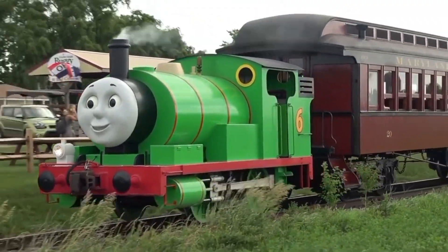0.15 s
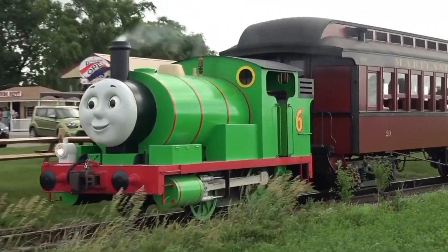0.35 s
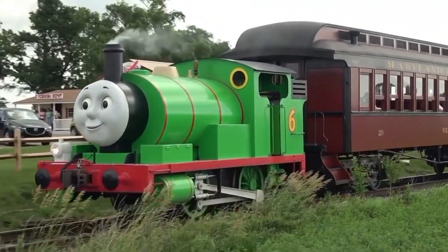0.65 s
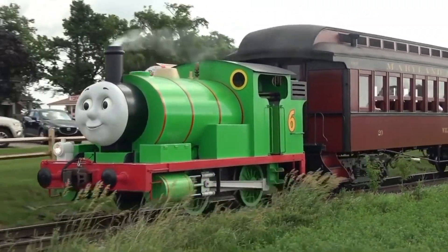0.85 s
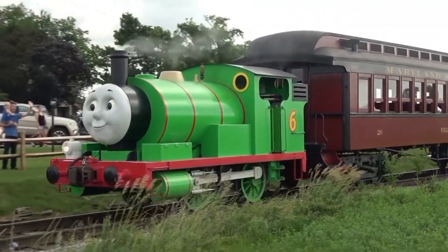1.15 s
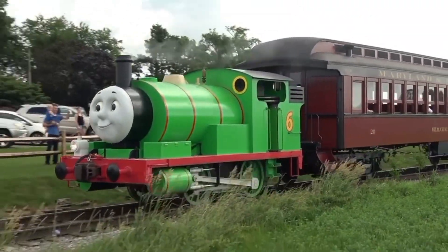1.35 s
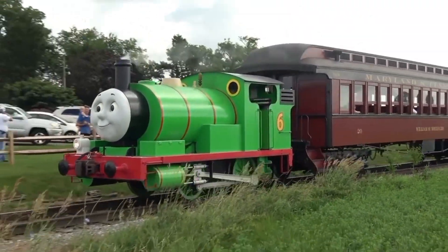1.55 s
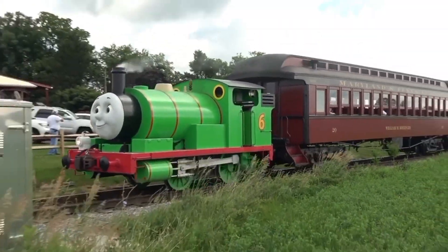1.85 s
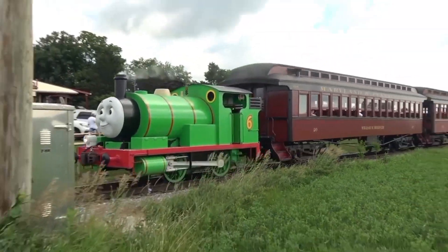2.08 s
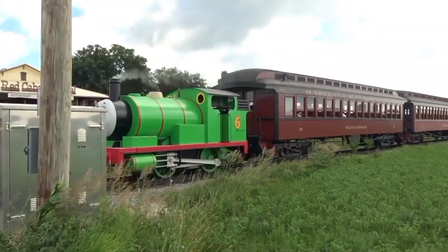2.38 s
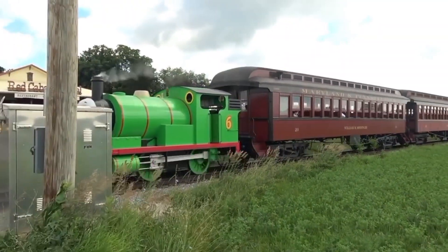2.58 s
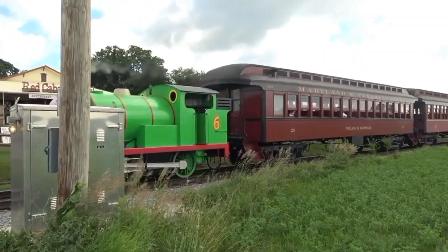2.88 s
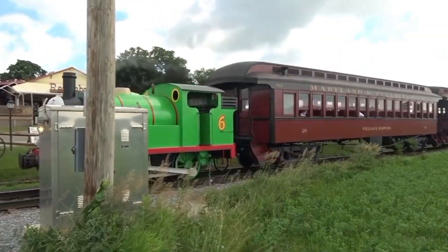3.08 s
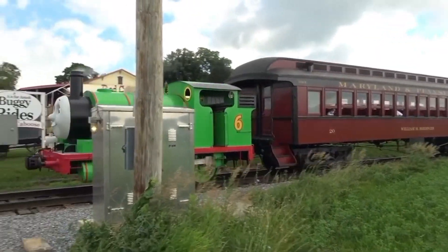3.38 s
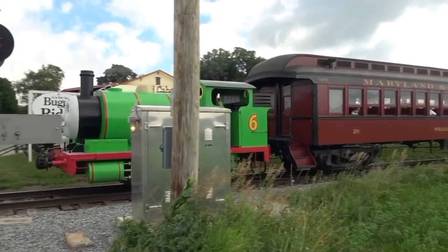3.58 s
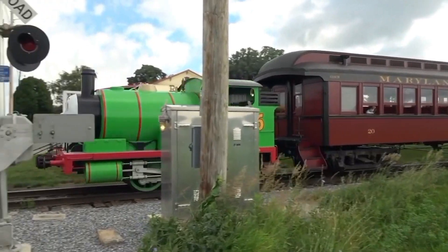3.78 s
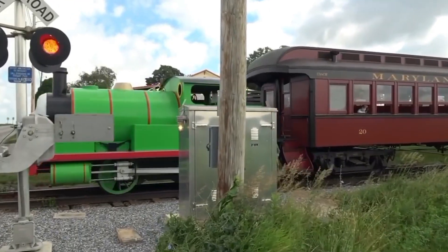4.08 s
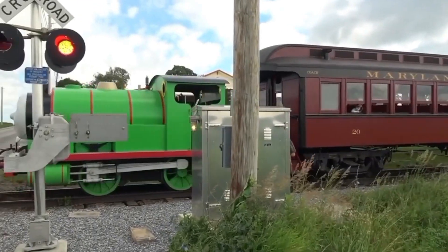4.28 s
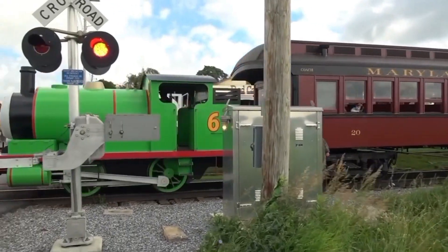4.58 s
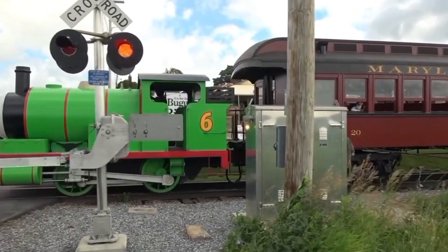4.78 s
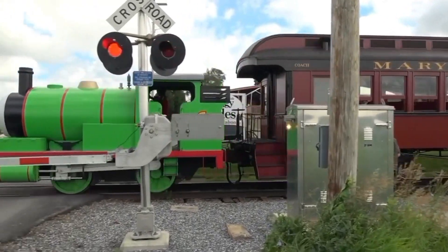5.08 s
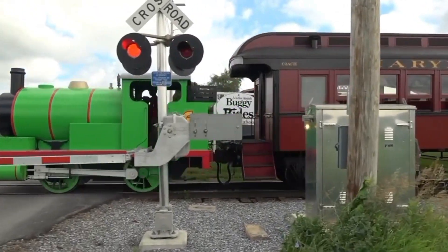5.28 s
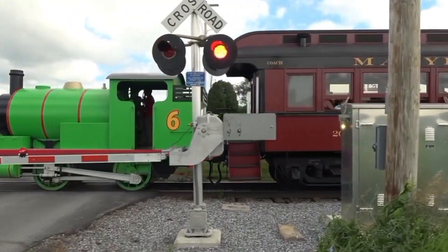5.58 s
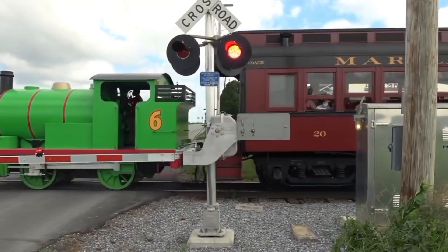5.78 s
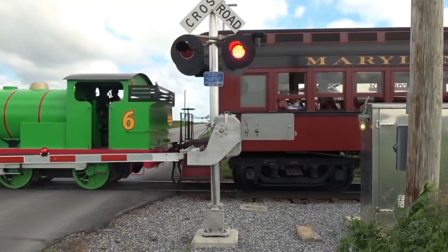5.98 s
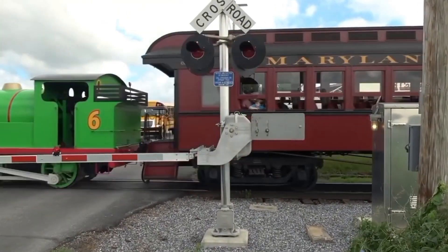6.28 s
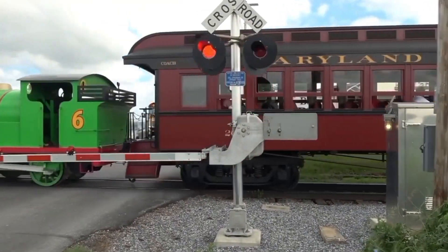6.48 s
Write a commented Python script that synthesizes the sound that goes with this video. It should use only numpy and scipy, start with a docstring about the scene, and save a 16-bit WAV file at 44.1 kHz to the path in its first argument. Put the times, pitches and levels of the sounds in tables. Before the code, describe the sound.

A steam locomotive blows five long and short high whistle blasts with hissing steam, over faint wheel rumble and knocks.

```python
"""A level crossing in open country: a small steam locomotive blows its single-pipe whistle five times.
Steam hisses at the whistle's lip; in the long third blast the valve eases to half and the note sags.
Sheds and carriages send the note back. Wheels rumble, knock over rail joints, and a flange sings faintly.
Wind buffets the microphone and small birds twitter far off. A limiter ducks all under the whistle."""
import sys
import numpy as np
from scipy import signal
from scipy.fft import rfft, irfft
from scipy.io import wavfile
from scipy.ndimage import uniform_filter1d

SR = 44100
rng = np.random.default_rng(int(sys.argv[2]) if len(sys.argv) > 2 else 0)


def unload_wav(signal):
    """Save mono or channel-first audio to the path in sys.argv[1] as 16-bit WAV at rate SR, clipped to [-1, 1]."""
    wavfile.write(
        sys.argv[1],
        SR,
        np.round(np.clip(np.atleast_2d(signal).T, -1, 1) * 32767).astype(np.int16),
    )


N = 292824

# Levels in the tables are relative; the functions add offsets.
# cord pulls: start_s, stop_s, pitch_hz, scoop_s, droop_s, swell_s, close_lead_s,
# hiss_db, sizzle_db, spit_db, breath_db, echo_send_db
BLASTS = [(-.2, 0.549, 1113, .01, 0.039, .05, 0.036, -28.5, -5, 0, 4, 1),
          (1.34, 1.534, 1120, .012, 0.00602, 0.044, 0.019, -21.5, -4.5, -7, -0.5, -0.5),
          (2.437, 4.885, 1109, .032, .018, 0.11, 0.012, -31, -0.5, 9.5, 0.5, -2),
          (5.085, 5.239, 1101, .012, 0.00677, 0.035, 0.0073, -45.5, -5, 4, 2.5, -1),
          (5.301, 5.498, 1101, .017, .006, 0.035, 0.046, -44.5, -2.5, 7, 1, -4)]
# valve easing in the long blast, last row holds to the end: time_s, sag_hz, hiss_change_db
VALVE_EASING = [(2.5, 0, 0.5), (2.72, 0, -2.5), (3.0, 0, 2), (3.2, -0.5, 4), (3.45, 6.5, 2), (3.51, 30, 1),
                (3.59, 92.5, -8.5), (3.74, 180, -11), (4.3, 197, -6), (4.6, 176.5, -5.5), (4.82, 157, -4.5),
                (4.95, 156.5, -4), (5.0, -0.5, 20)]
# note at the roadside, one list per blast: time_s, note_db, octave_db
NOTE_LEVELS = [
    [(0, -7, -19.5), (.07, -10, -19.5), (.12, -3.5, -23.5), (.2, -0.5, -24), (.3, -8.5, -24.5),
     (.36, -12.5, -24.5), (.39, -3.5, -18), (.43, -33, -19.5), (.47, -8.5, -23), (.55, 10.5, -26)],
    [(1.338, 13.5, -30), (1.36, -5.5, -16), (1.41, -13, -14), (1.44, -3, -12.5), (1.535, 0.5, -16)],
    [(2.437, 3.5, -11.5), (2.53, -0.5, -21), (2.9, 1, -20), (3.07, -4.5, -16.5), (3.2, -3.5, -21),
     (3.42, 3, -34.5), (3.565, -7.5, -40), (3.6, -25.5, -52), (3.71, -36.5, -50), (3.78, -26.5, -58),
     (4.04, -24, -52), (4.12, -19, -44), (4.36, -15.5, -51), (4.5, -17, -49), (4.57, -26.5, -51),
     (4.63, -22, -48), (4.72, -27.5, -50), (4.81, -22, -66), (4.855, -28.5, -61), (4.885, 0, -52)],
    [(5.088, -8.5, -27), (5.105, -3, -34), (5.15, 4, -38), (5.225, 2, -23), (5.243, 1, -25.5)],
    [(5.308, -10, -30), (5.333, -1, -43), (5.345, -19, -20), (5.36, -3, -30), (5.42, 2, -21.5),
     (5.5, -4, -30)],
]
# edge tones as the pipe starts or stops: start_s, end_s, from_hz, to_hz, level_db
SQUEAKS = [(1.331, 1.343, 1280, 1570, -13.5), (2.407, 2.439, 1290, 1555, -18),
           (4.892, 4.91, 1330, 1198, -31.5), (5.08, 5.091, 1450, 1565, -29),
           (5.305, 5.315, 1500, 1620, -30)]
# breathy upper pipe modes: harmonic, level_db, half_valve_change_db
PIPE_MODES = [(3, -10, 13), (4, -11.5, -6), (5, -11, -11)]
# steam noise spectra: freq_hz, density_db
HISS_SPECTRUM = [(1470, -6), (2500, -0.5), (3410, -11.5), (3710, -8.5), (4290, -2.5), (4720, -7),
                 (6020, -2.5), (9600, -9), (12500, -44), (21100, -120)]
SIZZLE_SPECTRUM = [(5410, -52), (9200, -24), (9870, 2.5), (11100, 8), (11800, 3), (13500, 3), (15300, 3)]
BREATH_SPECTRUM = [(400, -40), (700, -5.5), (1100, 5), (1450, 2.5), (1800, -11.5), (2600, -7),
                   (3400, -13.5)]
# jet resonances, at any opening and at half valve: centre_hz, width_hz, level_db
JET_RINGS = [(1410, 360, -10), (6100, 300, -8), (6900, 29, -14.5), (10040, 87, -5)]
HALF_VALVE_RINGS = [(2426, 105, -0.5), (11980, 810, 7.5), (13500, 1000, 1.5), (10570, 310, -0.5)]
# wall reflections: delay_s, sharp_db, smear_db
ECHOES = [(0.077, -18.5, -50), (0.199, -40, -41), (0.822, -53.5, -48)]
# wheel rumble: freq_hz, density_db
RUMBLE_SPECTRUM = [(88, -33), (150, 1), (611, -2.5), (901, -7.5), (1070, -4.5), (1280, -15), (1410, -27),
                   (3000, -42), (3900, -59), (6600, -120)]
# wheel rumble: time_s, level_db
RUMBLE_LEVELS = [(0, -33.5), (.5, -41), (.91, -46.5), (1.07, -32.5), (1.25, -40.5), (1.5, -38),
                 (1.72, -35.5), (1.85, -44.5), (2.46, -42), (3.3, -42), (3.6, -48.5), (4.05, -48),
                 (4.55, -47.5), (4.62, -33.5), (4.77, -41.5), (4.92, -35.5), (5.25, -40.5), (5.75, -39),
                 (6.34, -41), (6.64, -40.5)]
# jolts at rail joints: start_s, level_db, rattle_hz, rattle_t60_s
KNOCKS = [(.668, -33, 930, 0.077), (1.088, -27, 595.5, 0.62), (1.168, -24, 1300, 0.15),
          (1.618, -24.5, 1016, 0.22), (1.729, -26.5, 1100, 0.078), (4.068, -16.5, 450.5, 0.059),
          (4.875, -26, 151.9, 0.052), (5.592, -26, 801, 0.17), (5.6885, -21, 2005, 0.055),
          (6.151, -33, 688, 0.1), (6.516, -28, 1180, 0.48)]
# ringing of a wheel: freq_hz, level_db, t60_s
WHEEL_MODES = [(764, 13, 0.068), (1570, 2, 0.077), (2000, 17, 0.01), (2750, -17, 0.076), (3250, -5, 0.32),
               (3960, -14, 0.37), (4350, -42, .1)]
# flange tone: time_s, level_db
SQUEAL_LEVELS = [(4.9, -75), (5.02, -66), (5.1, -72), (5.8, -80), (6.0, -65), (6.2, -78), (6.4, -62),
                 (6.64, -61)]
# wind on the microphone: freq_hz, density_db
WIND_SPECTRUM = [(12, -32), (20, -22.5), (48, -2), (140, -0.5), (204, -7), (260, -15), (320, -17),
                 (420, -15.5), (700, -120)]
# breeze: time_s, level_db
BREEZE_LEVELS = [(0, -39), (.8, -38.5), (2.3, -46.5), (4.3, -41.5), (5.75, -39.5), (6.3, -73), (6.45, -47),
                 (6.64, -54)]
# gusts: centre_s, level_db, half_length_s
GUSTS = [(0.044, -24, 0.024), (0.323, -23, 0.16), (.66, -30.5, 0.042), (1.053, -30, 0.058),
         (1.625, -34.5, 0.1), (2.102, -33, 0.03), (3.141, -30.5, 0.11), (3.542, -32, 0.027),
         (3.79, -34, 0.062), (4.624, -33, 0.057), (4.88, -30, 0.027)]
# bird notes: level_db, [(time_s, pitch_hz), ...]
TWEETS = [(-50, [(.715, 2700), (.74, 2885)]), (-50, [(.745, 2410), (.775, 2500)]), (-53, [(.81, 2220),
          (.84, 2370)]), (-53.5, [(.88, 4980), (.9, 4700), (.915, 3890)]), (-55, [(.965, 4800),
          (.99, 4540)]), (-54.5, [(1.955, 4610), (1.975, 5170), (1.99, 4360), (2.0, 3400)]),
          (-54, [(2.005, 3000), (2.04, 3620), (2.06, 2940), (2.13, 2310)]), (-54, [(2.052, 3580),
          (2.068, 4400), (2.078, 3900)]), (-55, [(2.245, 4680), (2.27, 4830)])]
# distant hiss: freq_hz, density_db
DISTANT_SPECTRUM = [(880, -6), (1500, 3.5), (1650, -1.5), (3890, -14.5), (4250, -16.5), (4860, -17.5),
                    (5950, -20.5), (15000, -36.5)]
# capsule balance: freq_hz, left_minus_right_db
STEREO_TILT = [(60, 4), (110, 7), (200, 10), (380, 7), (700, 4.5), (920, 3), (1100, .9), (1400, .4),
               (3000, .2), (8000, .5), (14900, 1.2)]


def whistle():
    """Steam drives a pipe, jet turbulence frays the note. Returns (direct, sent to the walls)."""
    pitch_hz, flat, hiss_db, sizzle_db, breath_db, send_db, blows = valve()
    note_db, octave_db = curves(np.concatenate(NOTE_LEVELS))
    note_db, octave_db = note_db - 28 * flat, octave_db - 47 * flat
    speaks = gate(blast[:2] for blast in BLASTS)
    weak = np.clip((1090 - pitch_hz) / 140, 0, 1)  # 1 when the note sags, as at half valve
    breath_db = breath_db - 0.077 * (1 - weak) * np.maximum(note_db + 8.5, -10)  # softer note, more breath
    wander_hz, wobble_hz = 3.98 * drift(7.96), 7.1 * weak * drift(21.8)
    phase = 2 * np.pi * np.cumsum(pitch_hz + wander_hz + wobble_hz) / SR
    fray = amp(-29.5 + 12.5 * weak) * (drift(120) + 1j * drift(87))
    note = amp(note_db + 1.5 * weak * drift(30)) * np.imag((1 + fray) * np.exp(1j * phase))
    rough_db = 2 * (1 + 1.38 * weak) * drift(120)
    octave = amp(octave_db + rough_db) * np.sin(2 * phase + 0.31 * drift(60))
    modes = sum(amp(db + change_db * weak + 0.24 * (octave_db + 25.5))
                * (drift(56) * np.sin(k * phase) + drift(52) * np.cos(k * phase))
                for k, db, change_db in PIPE_MODES)
    jet = steam_jet(modes, speaks, weak, hiss_db, sizzle_db, breath_db)
    squeaks = sum(glide([(a, from_hz), (b, to_hz)], db) for a, b, from_hz, to_hz, db in SQUEAKS)
    common = np.sqrt(2) * speaks * octave + near_scatter(blows * jet) + squeaks
    sent = amp(send_db - 8.5 * weak) * np.sin(phase)  # without the fades of the direct path
    return np.sqrt(2) * speaks * note + common, np.sqrt(2) * speaks * sent + common


def valve(scoop_hz=334.9, droop_hz=309, close_db_per_s=525, trail_s=0.038):
    """Pitch and steam curves of the pulls; low pressure flattens both ends of each note."""
    t, pulls = np.arange(N) / SR, np.array(BLASTS)
    nearest = np.searchsorted((pulls[1:, 0] + pulls[:-1, 1]) / 2, t)
    (start_s, stop_s, held_hz, scoop_s, droop_s, swell_s, close_lead_s,
     hiss_db, sizzle_db, spit_db, breath_db, send_db) = pulls[nearest].T
    scoop = np.exp(-(np.maximum(t - start_s, 0) / scoop_s) ** 1.43)
    droop = np.exp(-(np.maximum(stop_s - t, 0) / droop_s) ** 1.2)
    sag_hz, eased_db = curves(VALVE_EASING)
    pitch_hz = held_hz - sag_hz - scoop_hz * scoop - droop_hz * droop
    open_s = start_s + 1.34 * scoop_s
    swell_left = np.clip((open_s - t) / swell_s, 0, 2)
    flow_db = -19 * swell_left - close_db_per_s * np.maximum(t - stop_s + close_lead_s, 0)
    hiss_db = hiss_db + eased_db + flow_db
    sizzle_db = sizzle_db + spit_db * np.sin(np.pi * np.minimum(swell_left, 1))
    breath_db = breath_db - 0.85 * flow_db  # breath follows only 15% of the swell and close
    blows = gate(sorted(set(zip(open_s - swell_s, stop_s + trail_s))), fade_s=0.072)
    return pitch_hz, scoop + droop, hiss_db, sizzle_db, breath_db, send_db, blows


def steam_jet(modes, speaks, weak, hiss_db, sizzle_db, breath_db, build_s=0.45):
    """Wet steam sputters at the lip: hiss, sizzle, breath. Extra rings build slowly at half valve."""
    step = 1 / (build_s * SR)
    built = signal.lfilter([step], [1, step - 1], weak * speaks) * speaks * np.minimum(2 * weak, 1)
    white = rng.standard_normal(N)
    rings = [amp(db) * narrow_band(white, hz, width) for hz, width, db in JET_RINGS + HALF_VALVE_RINGS]
    breath_ring, hiss_ring, thin_ring, sizzle_ring, half_ring, *half_top_rings = rings
    hiss = noise(HISS_SPECTRUM, 0.61, 16) + hiss_ring + thin_ring + built * half_ring + speaks * modes
    sizzle = amp(-5 * built) * noise(SIZZLE_SPECTRUM, 0.37, 12) + sizzle_ring
    sizzle += built * amp(3.35 * drift(20)) * sum(half_top_rings)
    breath = noise(BREATH_SPECTRUM, 1.0, 14.6) + breath_ring
    sputter = amp(0.84 * drift(23))
    steam = hiss + amp(sizzle_db - 2.5) * sizzle + amp(breath_db + 5) * breath
    return amp(hiss_db - 3.5) * sputter * steam


def wall_echoes(x, note_hz=1112, tail_t60_s=0.65):
    """Buildings return mostly the full note, with a thin tail; it flutters as the train moves."""
    t = np.arange(2 * SR) / SR
    tail = unit(rng.standard_normal(len(t))) * amp(-16 - 60 * t / tail_t60_s)
    response = tail * (t > 0.03) / np.sqrt(SR * 0.1)
    for delay_s, sharp_db, smear_db in ECHOES:
        i, spread = round(delay_s * SR), round(0.3 * delay_s ** 0.5 * SR)  # far walls smear more
        smear = rng.standard_normal(SR)[:spread] * np.hanning(spread) / np.sqrt(spread)
        response[i] += amp(sharp_db)
        response[i:i + spread] += amp(smear_db + 4) * smear
    dull = signal.lfilter(*signal.butter(1, 9300, fs=SR), x)
    reflected = resonance(x, note_hz, width_hz=70) + amp(-19) * dull
    flutter = amp(1.8 * drift(20))
    return flutter * signal.fftconvolve(reflected, response)[:N]


def near_scatter(x, level_db=-10.5, t60_s=0.24):
    """Adds a short bright decay off the ground and carriages."""
    t = np.arange(SR // 2) / SR
    response = rng.standard_normal(len(t)) * amp(-60 * t / t60_s) * (t > 0.006)
    return x + amp(level_db) * signal.fftconvolve(x, response / np.linalg.norm(response))[:N]


def wheel_rumble():
    """Wheels roll on the rails: low, uneven noise."""
    level_db, = curves(RUMBLE_LEVELS)
    return amp(level_db + 1.5) * noise(RUMBLE_SPECTRUM, flicker_db=2.94, rate_hz=19)


def joint_knocks(attack_s=0.004):
    """Each rail joint strikes the wheel modes and shakes out a short broad rattle."""
    strikes_db = rng.normal(-23.5, 3, (len(KNOCKS), len(WHEEL_MODES)))
    out, t = np.zeros(N), np.arange(SR // 3) / SR
    for (start_s, level_db, rattle_hz, rattle_t60_s), mode_gains_db in zip(KNOCKS, strikes_db):
        ring = sum(amp(db + gain_db - 60 * t / t60_s) * np.sin(2 * np.pi * hz * t)
                   for (hz, db, t60_s), gain_db in zip(WHEEL_MODES, mode_gains_db))
        rattle = unit(resonance(resonance(rng.standard_normal(len(t)), rattle_hz, 800), rattle_hz, 2500))
        rattle *= amp(-9 - 60 * t / rattle_t60_s) * np.minimum(t / attack_s, 1)
        i = round(start_s * SR)
        out[i:i + len(t)] += (amp(level_db) * (ring + rattle))[:N - i]
    return out


def flange_squeal():
    """A wheel flange sings on the rail: a faint, thin, wavering tone."""
    level_db, = curves(SQUEAL_LEVELS)
    return amp(level_db) * narrow_band(rng.standard_normal(N), hz=3880, width_hz=30)


def wind():
    """Breeze and gusts buffet the microphone; their powers add."""
    t = np.arange(N) / SR
    breeze_db, = curves(BREEZE_LEVELS)
    gust_power = sum(amp(db) ** 2 * np.exp(-((t - at_s) / half_s) ** 2) for at_s, db, half_s in GUSTS)
    return np.sqrt(amp(breeze_db) ** 2 + gust_power) * noise(WIND_SPECTRUM, flicker_db=2.15, rate_hz=9.1)


def birds():
    """Single notes, frayed by distance, over the blurred chatter of many small birds."""
    notes = sum(glide(path, db) for db, path in TWEETS) * amp(2.1 * drift(90))
    chatter = narrow_band(rng.standard_normal(N), hz=4800, width_hz=500) * amp(-69 + 3.9 * drift(17))
    return near_scatter(near_scatter(notes)) + chatter


def distant_hiss():
    """Faint, nearly steady noise from far off."""
    return amp(-47) * noise(DISTANT_SPECTRUM, flicker_db=1.0, rate_hz=1.9)


def amp(db):
    """Decibels to gain."""
    return 10 ** (np.asarray(db) / 20)


def unit(x):
    """Scale to rms 1."""
    return x / np.sqrt(np.mean(x ** 2) + 1e-20)


def curves(rows):
    """Rows of (time_s, values...) to one per-sample curve per value column."""
    time_s, *columns = np.transpose(rows)
    return [np.interp(np.arange(N) / SR, time_s, column) for column in columns]


def gate(spans_s, fade_s=0.0049):
    """1 inside the spans, fading at their inner edges."""
    t = np.arange(N) / SR
    return sum(np.clip(np.minimum(t - a + (a <= 0), b - t) / fade_s, 0, 1) for a, b in spans_s)


def at_hz(spectrum, hz):
    """Read a spectrum on a log-frequency axis."""
    freq_hz, level_db = np.transpose(spectrum)
    return np.interp(np.log(hz), np.log(freq_hz + 1), level_db)


def drift(rate_hz):
    """Smooth random curve, rms 1."""
    r = np.exp(-2 * np.pi * rate_hz / SR)
    return unit(signal.lfilter([1], [1, -2 * r, r * r], rng.standard_normal(N + SR))[SR:])


def noise(spectrum, flicker_db, rate_hz):
    """Coloured noise, rms 1; its octaves flicker partly together, partly alone."""
    hz = np.fft.rfftfreq(N, 1 / SR) + 1
    low_hz, high_hz = spectrum[0][0], spectrum[-1][0]
    coloured = rfft(rng.standard_normal(N)) * amp(at_hz(spectrum, hz)) * ((hz > low_hz) & (hz < high_hz))
    out, shared = np.zeros(N), drift(rate_hz / 2)
    for octave in range(int(np.log2(low_hz)), int(np.log2(high_hz)) + 2):
        band = irfft(coloured * np.clip(1 - abs(np.log2(hz) - octave), 0, 1), N)
        out += band * amp(flicker_db * (shared + drift(rate_hz)))
    return unit(out)


def resonance(x, hz, width_hz):
    """Two-pole resonance, peak gain 1."""
    r = np.exp(-np.pi * width_hz / SR)
    gain = (1 - r * r) / 2
    return signal.lfilter([gain, 0, -gain], [1, -2 * r * np.cos(2 * np.pi * hz / SR), r * r], x)


def narrow_band(x, hz, width_hz):
    """Two equal resonances in series, rms 1."""
    return unit(resonance(resonance(x, hz, width_hz), hz, width_hz))


def glide(path, level_db):
    """Sine along (time_s, pitch_hz) points under a rounded envelope."""
    t, (time_s, pitch_hz) = np.arange(N) / SR, np.transpose(path)
    envelope = np.sin(np.pi * np.clip((t - time_s[0]) / (time_s[-1] - time_s[0]), 0, 1)) ** 0.27
    phase = 2 * np.pi * np.cumsum(np.interp(t, time_s, pitch_hz)) / SR
    return np.sqrt(2) * amp(level_db) * envelope * np.sin(phase)


def scene():
    """Whistle and echoes over train, wind and birds; both channels alike."""
    direct, sent = whistle()
    bed = wind() + wheel_rumble() + distant_hiss()
    return np.tile(direct + wall_echoes(sent) + bed + joint_knocks() + birds() + flange_squeal(), (2, 1))


def record(dry, threshold_db=-7.5, release_db_per_s=103, cutoff_hz=15450):
    """Limiter, more bass in the left capsule, faint noise floor, steep top cut."""
    excess_db = np.maximum(20 * np.log10(abs(dry[0]) + 1e-9) - threshold_db, 0)
    release_db = release_db_per_s * np.arange(N) / SR
    cut_db = np.maximum.accumulate(0.76 * excess_db + release_db) - release_db
    limited = dry * amp(-uniform_filter1d(cut_db, size=160))
    left_over_right = amp(at_hz(STEREO_TILT, np.fft.rfftfreq(N, 1 / SR) + 1))
    left_gain = 2 * left_over_right / (1 + left_over_right)
    stereo = irfft(rfft(limited) * [left_gain, 2 - left_gain], N)
    stereo += amp(-85) * rng.standard_normal((2, N))
    return signal.sosfilt(signal.ellip(10, 0.5, 60, cutoff_hz, fs=SR, output="sos"), stereo)


dry = scene()
out = record(dry)
unload_wav(out)
```